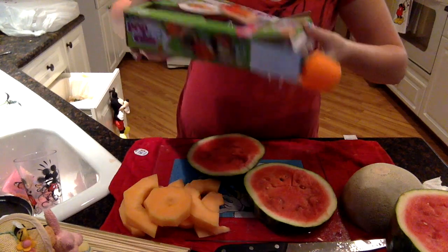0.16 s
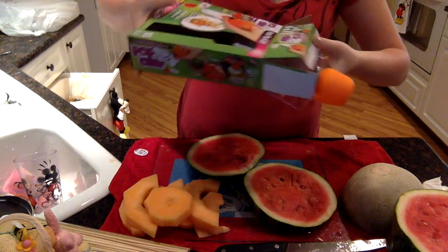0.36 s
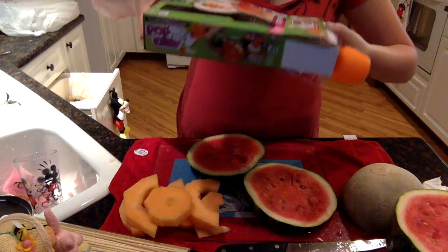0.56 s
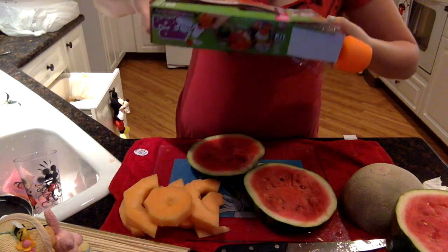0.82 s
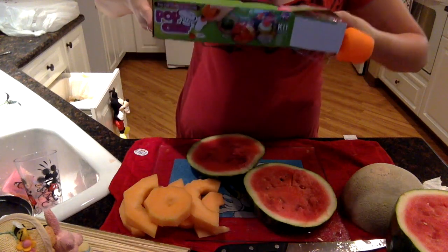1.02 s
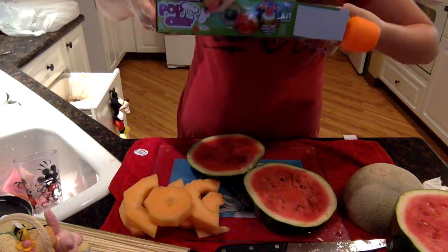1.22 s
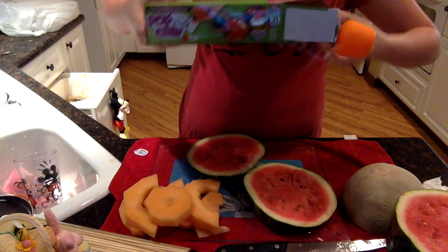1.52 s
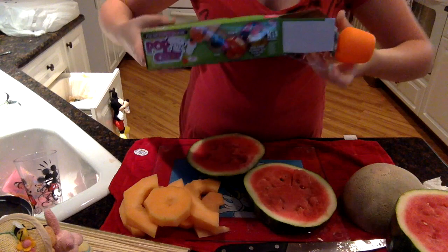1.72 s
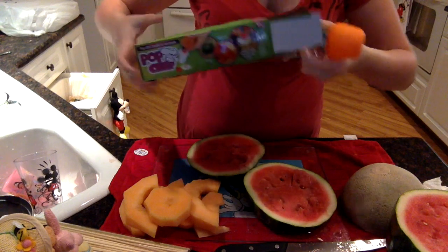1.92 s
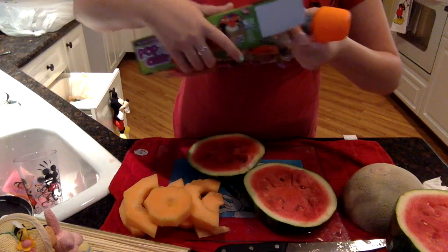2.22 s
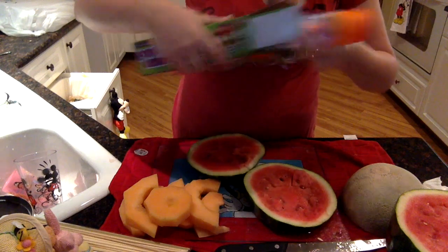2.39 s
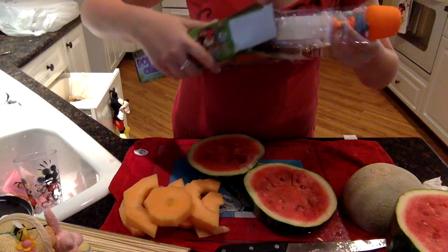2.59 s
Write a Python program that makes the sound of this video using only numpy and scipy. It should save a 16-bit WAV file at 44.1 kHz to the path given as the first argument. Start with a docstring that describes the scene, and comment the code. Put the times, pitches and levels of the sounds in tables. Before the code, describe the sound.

A cardboard box with a thin plastic tray is handled close up in a hard, lively kitchen. Faint rubbing and light taps start it; firm hollow snaps fall at 0.5 and 0.73 s. Small crinkles and knocks cluster from 0.83 to 1.7 s over soft scraping, with a sharp snap at 1.79 s. Sparse ticks follow, then loud distorted snaps at 2.39 and 2.56 s surround a rough, crackling slide.

```python
"""A cardboard box is turned over and opened above a kitchen counter, and a thin plastic tray is pulled out.
Box hollow, card panels, tray walls and tray creases are four banks of resonances. Bursts of slips drive them
as knocks, snaps and crinkles, and dense runs of catches drive them as hiss and scrape along the card.
Square blows leave tones, and low thumps lie under the two hardest, overloaded snaps. A hard kitchen answers
with two echoes and a diffuse tail over faint low air noise; peaks beyond full scale clip."""
import sys
import numpy as np
from scipy import signal
from scipy.io import wavfile

SR = 44100
rng = np.random.default_rng(int(sys.argv[2]) if len(sys.argv) > 2 else 0)


def digitize_waveform(pressure):
    """Quantize a signal to 16-bit integers and store it at the path in sys.argv[1].

    Rows of a 2-D input are taken as channels; values are limited to [-1, 1].
    """
    field = np.atleast_2d(pressure).T
    bounded = np.clip(field, -1, 1)
    quanta = np.round(bounded * 32767).astype(np.int16)
    wavfile.write(sys.argv[1], SR, quanta)


N = 121275
TIME = np.arange(N) / SR


def amp(db):
    """Decibels to linear gain."""
    return 10 ** (np.asarray(db) / 20)


def unit_energy(x):
    """Scale a sound so its squared samples sum to one."""
    return x / np.sqrt(np.sum(x ** 2) + 1e-20)


def band(x, low_hz, high_hz):
    """Causal band-pass."""
    sos = signal.butter(2, [low_hz, min(high_hz, 0.45 * SR)], "band", fs=SR, output="sos")
    return signal.sosfilt(sos, x + 1e-18)


def add(out, start_s, sound):
    """Mix a sound in at a time; anything past the end is dropped."""
    i = max(int(start_s * SR), 0)
    out[i:i + len(sound)] += sound[:max(len(out) - i, 0)]


AIR_DB, AIR_CORNER_HZ = -70.5, 200  # rms level, gentle low-pass corner


def background():
    """Faint low air noise of the room."""
    low_pass = signal.butter(1, AIR_CORNER_HZ, fs=SR, output="sos")
    air = signal.sosfilt(low_pass, rng.standard_normal(N))
    return amp(AIR_DB) * unit_energy(band(air, 95, 15000)) * np.sqrt(N)


MODE_SPREAD_DB = 2.5  # chance spread of each resonance's level


def flexed(modes, detune):
    """Bending shifts a part's resonances: one chance state, with a chance level for each."""
    bent = []
    for mode_hz, width_hz, level_db in modes:
        bent_hz = mode_hz * np.exp(detune * rng.standard_normal())
        bent.append((bent_hz, width_hz, level_db + MODE_SPREAD_DB * rng.standard_normal()))
    return bent


# resonances of the four parts, before bending: (mode_hz, width_hz, level_db)
HOLLOW_MODES = [(189, 110, -14), (276.5, 48, -1.5), (363.5, 101, 1.5), (436.6, 119, 0.5)]
PANEL_MODES = [(667, 117, 1), (886, 87, 4.5), (1053, 114, 6.5), (1323, 205, 6), (1658, 296, 3.5),
               (2035, 375, 2), (2530, 1470, -15)]
WALL_MODES = [(2890, 2860, -8), (3677, 670, 0), (4516, 690, 1), (4895, 550, 2), (5440, 680, 0)]
CREASE_MODES = [(6480, 1520, -4), (7700, 1100, -0.17), (8980, 1260, 1), (10910, 1200, -4.5),
                (11830, 1250, -2.5), (15300, 1900, -18.5)]


def body(force, modes, low_hz, high_hz):
    """Parallel resonances of one part, with alternating signs."""
    out = 0
    for k, (mode_hz, width_hz, level_db) in enumerate(modes):
        radius = np.exp(-np.pi * width_hz / SR)  # wider resonances die sooner
        gain = (1 - radius ** 2) / 2
        feedback = [1, -2 * radius * np.cos(2 * np.pi * mode_hz / SR), radius ** 2]
        out = out + (-1) ** k * amp(level_db) * signal.lfilter([gain, 0, -gain], feedback, force)
    return band(out, low_hz, high_hz)


STROKE_RISE_S, STROKE_FALL_S, GRAINS_PER_S = 0.05, 0.075, 1500


def catches(start_s, end_s, grain_db):
    """Card and plastic slide in a dense run of uneven catches; the stroke swells, holds and fades."""
    caught = rng.random(N) < GRAINS_PER_S / SR
    signs = rng.choice([-1, 1], N)
    sizes = amp(grain_db * np.minimum(rng.exponential(1, N), 4)) * signs
    swell = (TIME - start_s) / STROKE_RISE_S
    fade = (end_s - TIME) / STROKE_FALL_S
    pressure = np.clip(np.minimum(swell, fade), 0, 1)
    return pressure * unit_energy(caught * sizes) * np.sqrt(N)


SLIDE_DETUNE, SLIDE_STEP_S = 0.071, 0.02  # share by which the carton's resonances shift, and how often
# rubbing strokes, levels before the swell and fade:
# (start_s, end_s, hollow_db, panels_db, walls_db, creases_db, graininess_db)
STROKES = [(-.01, 0.057, -48, -56, -51, -46.5, 3), (0.133, 0.434, -58, -54.5, -62.5, -68, 20),
           (0.429, 0.59, -43, -45, -67, -84, 9.5), (0.372, 0.733, -88, -50, -53, -43, 3.5),
           (0.76, 1.133, -64, -47, -54, -60, 8), (1.132, 1.56, -65.5, -53, -75, -94, 5.5),
           (1.47, 1.687, -51, -43.5, -47.5, -58, 7.5), (2.423, 2.565, -33, -28, -30.5, -28.5, 5)]


def rubbing(part, runs, modes, low_hz, high_hz):
    """Catches of every stroke shake one part; the carton keeps bending as the tray slides through it."""
    force = np.zeros(N)
    for run, (start_s, end_s, *levels_db) in zip(runs, STROKES):
        force += amp(levels_db[part]) * run
    out, hop = np.zeros(N), int(SLIDE_STEP_S * SR)
    is_carton = part < 2  # hollow and panels bend, the tray parts stay put
    for i in range(0, N, hop):
        bent = flexed(modes, SLIDE_DETUNE) if is_carton else modes
        response = unit_energy(body(signal.unit_impulse(SR // 20), bent, low_hz, high_hz))
        add(out, i / SR, signal.fftconvolve(force[i:i + hop], response))
    return out


MOVE_S = 0.25  # the box has moved to a new spot after this long
ROOM_RAMP_S = 0.0016  # the tail fades in over this long, after half as long in silence
# reverberation of the kitchen: (band_hz, t60_s)
KITCHEN_DECAY = [(200, 0.26), (2000, 0.48), (5000, 0.36), (9000, 0.27), (15000, 0.14)]


def kitchen_tail():
    """Diffuse reverberation, dying at its own pace in each band."""
    t, out = TIME[:SR * 2 // 3], 0
    band_hz, t60_s = np.transpose(KITCHEN_DECAY)
    edges_hz = np.geomspace(80, 19000, 13)
    for low_hz, high_hz in zip(edges_hz, edges_hz[1:]):
        log_centre = np.log(low_hz * high_hz) / 2
        decay_s = np.interp(log_centre, np.log(band_hz), t60_s)
        out = out + band(rng.standard_normal(len(t)), low_hz, high_hz) * amp(-60 * t / decay_s)
    return unit_energy(out * np.clip(t / ROOM_RAMP_S - 0.5, 0, 1))


def kitchen(sound):
    """The box keeps moving, so every MOVE_S seconds it meets a fresh pattern of reflections."""
    out, hop = np.zeros(N), int(MOVE_S * SR)
    for i in range(0, N, hop):
        add(out, i / SR, signal.fftconvolve(sound[i:i + hop], kitchen_tail()))
    return out


# first reflections from counter and cupboards, levels against the direct sound: (delay_s, level_db)
ECHOES = [(.0087, -17), (0.0151, -14)]


def first_echoes(direct):
    """Hard surfaces return delayed, quieter copies of the contacts and rubbing."""
    out = np.zeros(N)
    for delay_s, level_db in ECHOES:
        add(out, delay_s, amp(level_db) * direct)
    return out


ATTACK_S = 0.000082
FLEX_DETUNE = 0.023  # share by which resonances shift from one contact to the next
SLIP_SPREAD_DB = 3.5  # unevenness of the slips within one contact
SKIRT_DB, SKIRT_S = -21.5, 0.001  # faint noise skirt round each contact, softening its edge
# knocks and snaps, by how hard each drives each part before that part's blow level:
# (start_s, hollow_db, panels_db, walls_db, creases_db)
CONTACTS = [(0.1516, -29, -34.5, -37.5, -33.5), (0.1781, -39, -32.5, -39.5, -52.0),
            (0.2852, -39.5, -28.5, -39.5, -41.5), (0.3405, -41, -72, -43, -38.5),
            (0.3563, -37, -39, -66, -50), (0.4946, -30.5, -22, -19, -19.5), (0.6441, -80, -42.5, -35, -30),
            (0.7346, -33, -23, -28, -26), (0.834, -27.5, -28, -35, -41), (0.845, -50, -32, -35.5, -31.5),
            (0.9924, -47, -32, -44, -46), (1.0048, -58, -55, -36.5, -57), (1.043, -32.5, -39, -39.5, -42.5),
            (1.0609, -39, -30.5, -39, -35), (1.0706, -46, -50, -31, -30.5), (1.0819, -31, -33.5, -47, -39),
            (1.1825, -51, -64, -43.5, -45), (1.2388, -40.5, -32, -33.5, -28),
            (1.2529, -53, -35.5, -31, -28.5), (1.318, -69, -39, -34, -30.5), (1.3242, -51, -32, -38, -61),
            (1.3379, -43.5, -31.5, -34.5, -42.5), (1.4209, -43, -25, -40.5, -44.5),
            (1.4735, -37, -36, -41, -70), (1.5175, -40.5, -35.5, -40, -33.5),
            (1.5272, -40, -35, -21.5, -23), (1.5361, -26, -25, -45, -44.5), (1.555, -44, -33.5, -41, -32),
            (1.5647, -51, -25.5, -28.5, -31), (1.5712, -54, -35.5, -33.5, -27.5),
            (1.5857, -48, -27, -29, -35), (1.6222, -58, -36, -35, -31), (1.7132, -74, -34, -26.5, -36),
            (1.7295, -47, -42.5, -30.5, -33), (1.7852, -34.5, -25, -21, -14),
            (1.975, -50.5, -43.5, -42.5, -36.5), (2.0012, -37.5, -31.5, -29, -34.5),
            (2.0722, -36, -35, -46.5, -82.5), (2.2078, -59, -38, -56, -61),
            (2.2246, -39, -37.5, -36.5, -47.5), (2.2888, -33, -27.5, -24, -20.5),
            (2.391, -31.5, -27, -21, -15), (2.4277, -36.5, -29, -24.5, -28.5),
            (2.4457, -29, -20.5, -36, -23.5), (2.4682, -21.5, -22.5, -21.5, -22.5),
            (2.4983, -30.5, -28.5, -28, -28), (2.523, -39, -32, -30, -30), (2.559, -30.5, -23, -19, -18)]


def knocks(part, modes, low_hz, high_hz, buckle_t60_s):
    """Bursts of uneven slips set a part ringing; returns them and the smoother clicks that feed the room."""
    direct, all_round = np.zeros(N), np.zeros(N)
    lead = SR // 50  # time for the skirt before the contact
    t = TIME[:SR // 8] - TIME[lead]
    after = np.maximum(t, 0)
    buckle = (1 - np.exp(-after / ATTACK_S)) * amp(-60 * after / buckle_t60_s)
    skirt = amp(SKIRT_DB) * np.exp(-np.abs(t) / SKIRT_S)
    for start_s, *levels_db in CONTACTS:
        unevenness = amp(SLIP_SPREAD_DB * rng.standard_normal(len(t)))
        slips = rng.standard_normal(len(t)) * unevenness * (buckle + skirt)
        impulse = t == 0
        burst, click = body(np.array([slips, impulse]), flexed(modes, FLEX_DETUNE), low_hz, high_hz)
        level = amp(levels_db[part])
        add(direct, start_s + t[0], level * unit_energy(burst))
        add(all_round, start_s + t[0], level * unit_energy(click))
    return direct, all_round


# tones that box and tray hold after a square blow: (start_s, pitch_hz, width_hz, level_db, t60_s)
RINGS = [(0.7351, 869, 129, -30.5, 0.32), (0.7351, 1337, 109, -19.5, 0.051),
         (0.7351, 1950, 130, -22, 0.025), (1.421, 1150, 252, -34, 0.3), (1.786, 1840, 402, -32.5, 0.72),
         (2.155, 389, 100, -26, 0.09), (2.155, 806, 90.5, -36, 0.074), (2.3913, 7700, 900, -1, 0.0075),
         (2.5594, 4330, 900, -7.5, 0.013), (2.559, 2470, 300, -35, 0.36)]


def ringing():
    """A blow starts a cluster of close modes in step, as one tone; they drift apart and beat as they die."""
    out, t = np.zeros(N), TIME[:SR // 2]
    for start_s, pitch_hz, width_hz, level_db, t60_s in RINGS:
        noise = rng.standard_normal(len(t))
        cluster = unit_energy(band(noise, pitch_hz - width_hz / 2, pitch_hz + width_hz / 2)) * np.sqrt(len(t))
        in_step = np.exp(-(width_hz * t) ** 2)
        pure = np.sqrt(2 * in_step) * np.sin(2 * np.pi * pitch_hz * t)
        tone = pure + np.sqrt(1 - in_step) * cluster
        onset = 1 - np.exp(-pitch_hz * t)
        add(out, start_s, amp(level_db - 60 * t / t60_s) * onset * tone)
    return out


THUMP_S = 0.00028  # time from start to peak, before band-limiting
# low thumps under the two hardest, overloaded snaps, peaks before band-limiting: (start_s, peak_db)
THUMPS = [(2.392, -29), (2.559, -32.5)]


def thumps():
    """Each overloaded snap has one short smooth bump under it, heard as a low thump."""
    out, t = np.zeros(N), TIME[:SR // 20] / THUMP_S
    for start_s, peak_db in THUMPS:
        add(out, start_s, amp(peak_db) * t * np.exp(1 - t))
    return band(out, 11, 2000)


CONTACT_S = 0.005  # contact levels are rms over this long
# hollow, panels, walls, creases, with the decay of the buckling that drives each:
# (low_edge_hz, high_edge_hz, buckle_t60_s, blow_db, room_db)
PARTS = [(117, 1700, 0.013, -0.5, -7), (530, 4700, 0.021, 0, -6.5), (2440, 5420, 0.015, 1, -9),
         (6000, 15400, 0.011, 3, -8)]


def scene():
    """Carton and tray, their first echoes and the room."""
    direct, send = np.zeros(N), np.zeros(N)
    runs = [catches(start_s, end_s, grain_db) for start_s, end_s, *_, grain_db in STROKES]
    banks = (HOLLOW_MODES, PANEL_MODES, WALL_MODES, CREASE_MODES)
    for part, (modes, settings) in enumerate(zip(banks, PARTS)):
        low_hz, high_hz, buckle_t60_s, blow_db, room_db = settings
        blow = amp(blow_db) * np.sqrt(CONTACT_S * SR)
        rub = rubbing(part, runs, modes, low_hz, high_hz)
        straight, all_round = knocks(part, modes, low_hz, high_hz, buckle_t60_s)
        direct += blow * straight + rub
        send += amp(room_db) * (blow * all_round + rub)
    room = kitchen(send) + first_echoes(direct)
    out = background() + direct + room + ringing() + thumps()
    return out[None]


CLIP_LEVEL, CUTOFF_HZ = 1.0, 16000  # full scale, steep low-pass corner


def record(dry):
    """The input clips at full scale and the top is cut."""
    top_cut = signal.ellip(10, 0.1, 70, CUTOFF_HZ, fs=SR, output="sos")
    return signal.sosfilt(top_cut, np.clip(dry, -CLIP_LEVEL, CLIP_LEVEL))


dry = scene()
out = record(dry)
digitize_waveform(out)
```